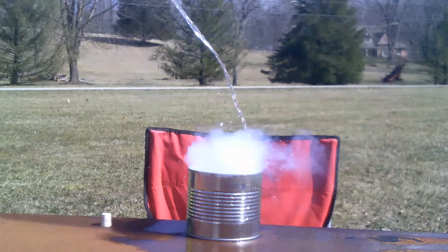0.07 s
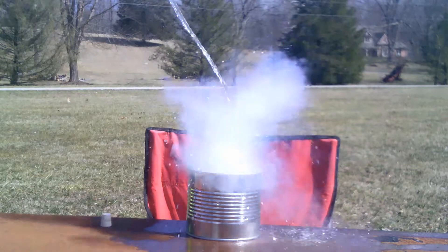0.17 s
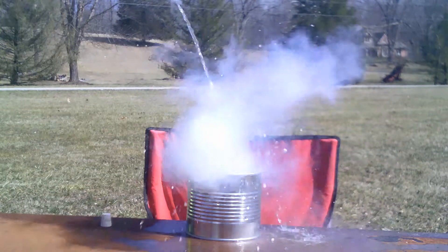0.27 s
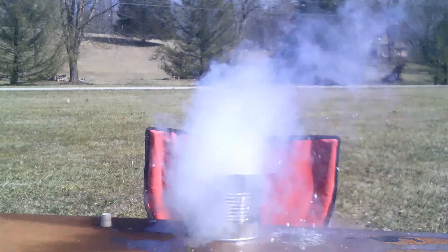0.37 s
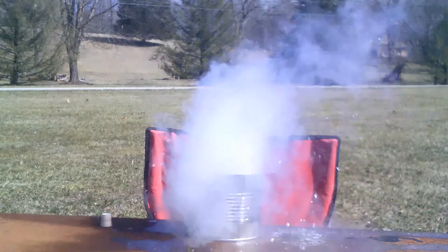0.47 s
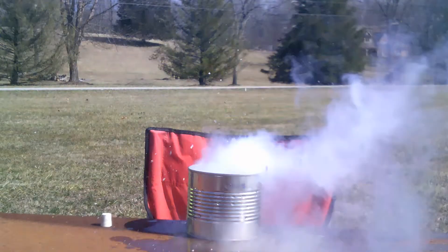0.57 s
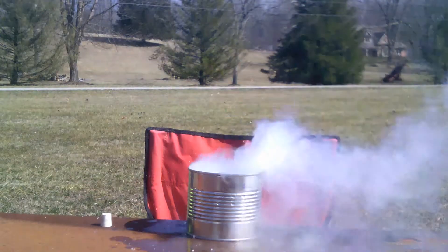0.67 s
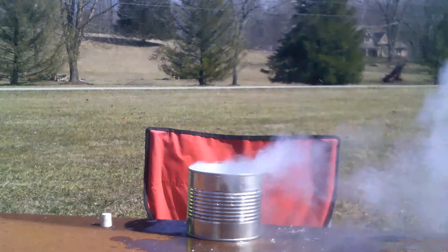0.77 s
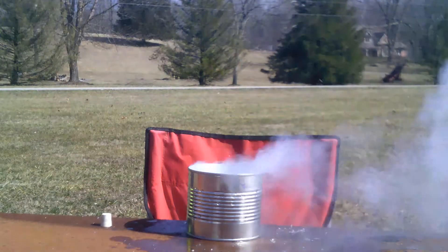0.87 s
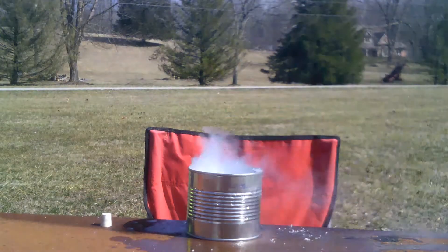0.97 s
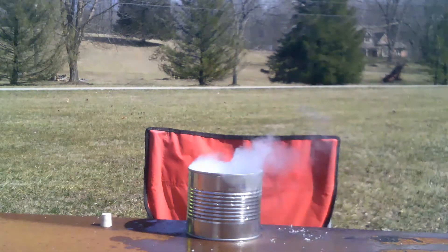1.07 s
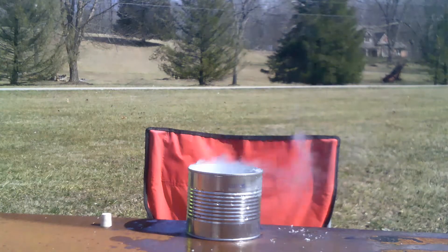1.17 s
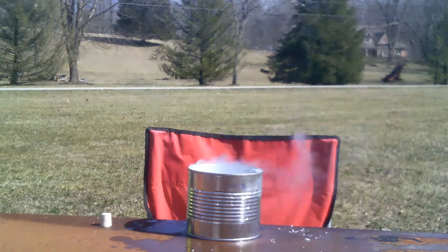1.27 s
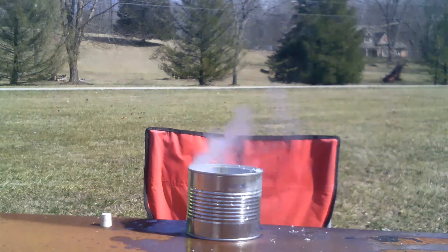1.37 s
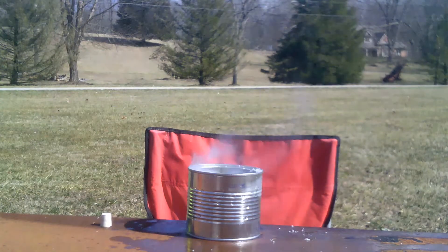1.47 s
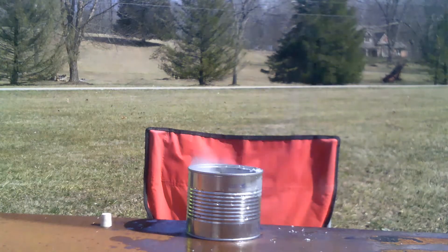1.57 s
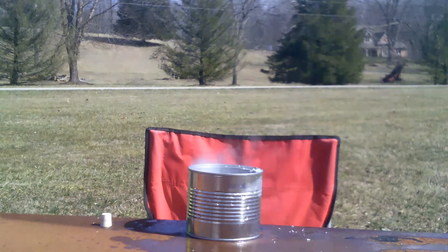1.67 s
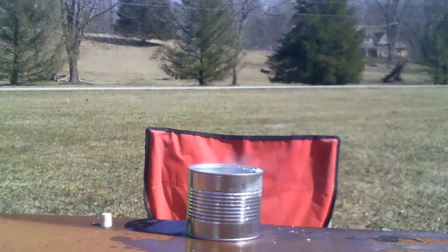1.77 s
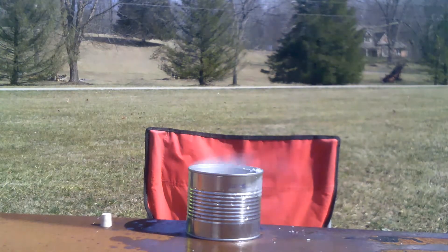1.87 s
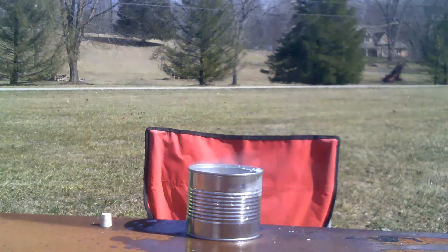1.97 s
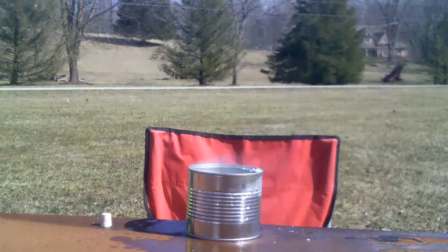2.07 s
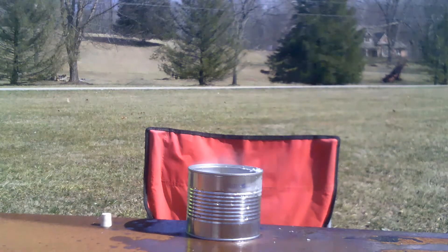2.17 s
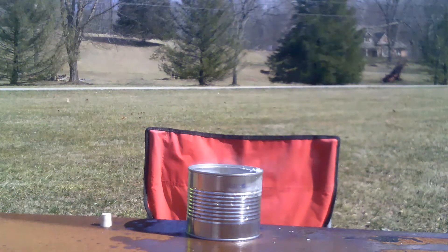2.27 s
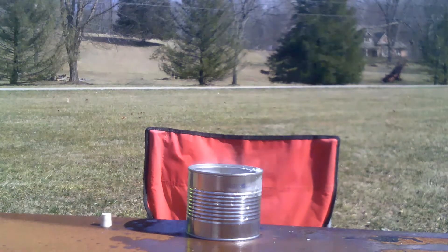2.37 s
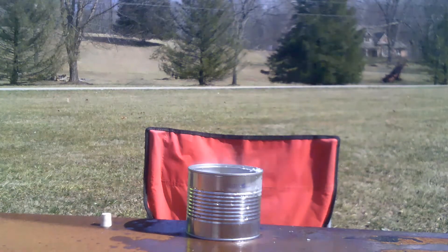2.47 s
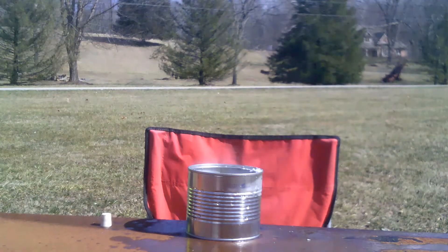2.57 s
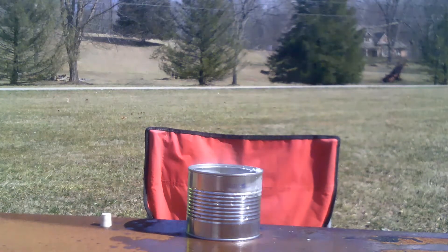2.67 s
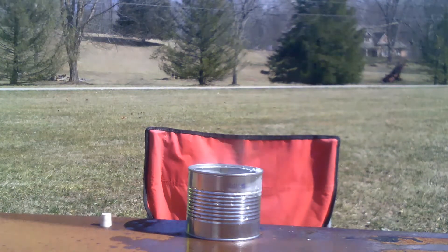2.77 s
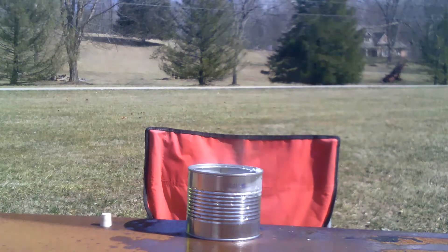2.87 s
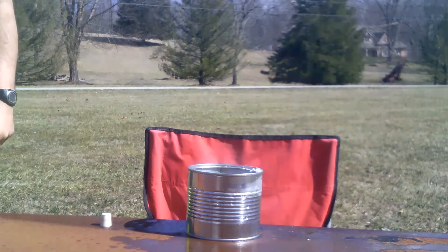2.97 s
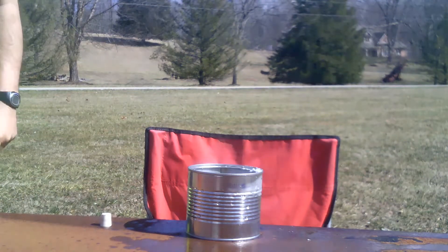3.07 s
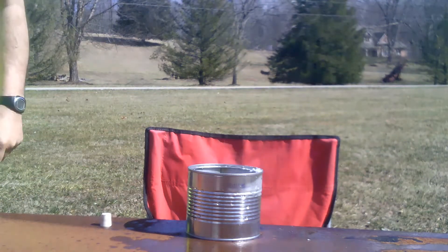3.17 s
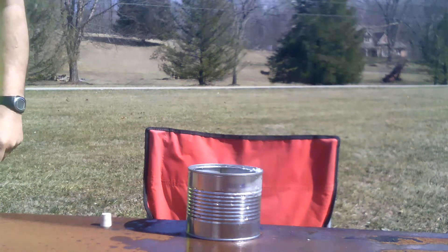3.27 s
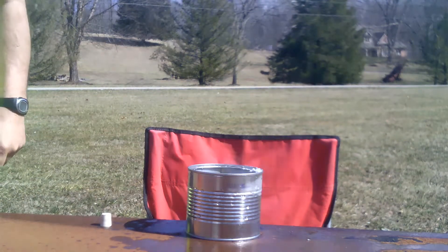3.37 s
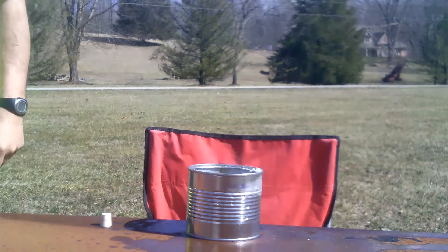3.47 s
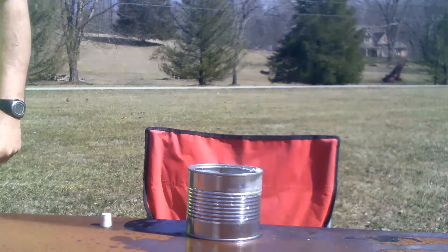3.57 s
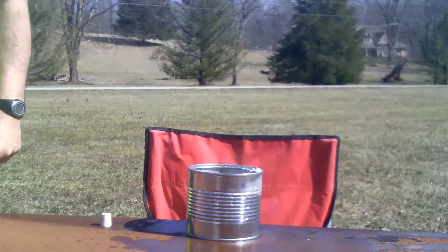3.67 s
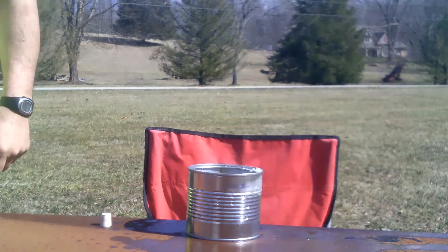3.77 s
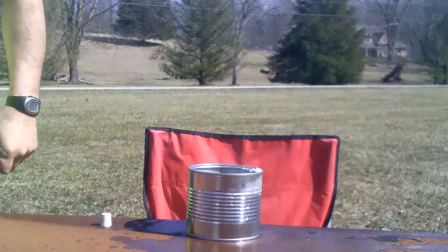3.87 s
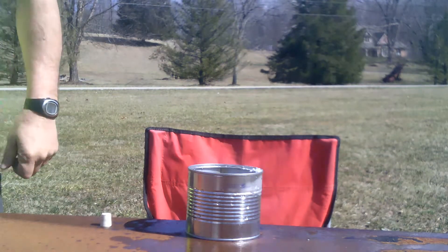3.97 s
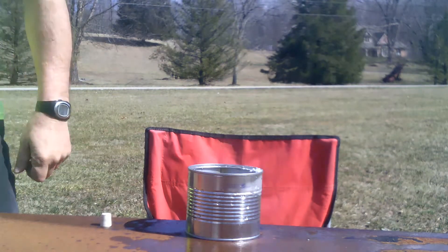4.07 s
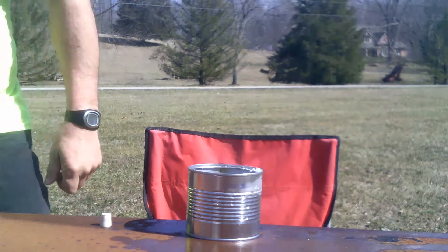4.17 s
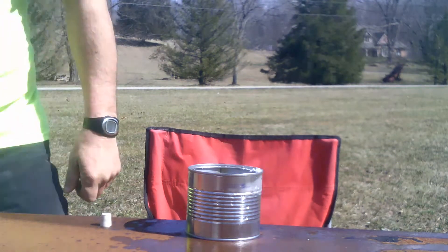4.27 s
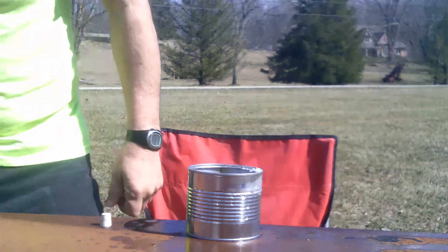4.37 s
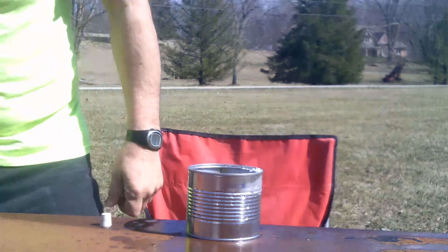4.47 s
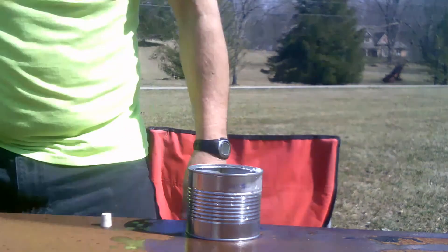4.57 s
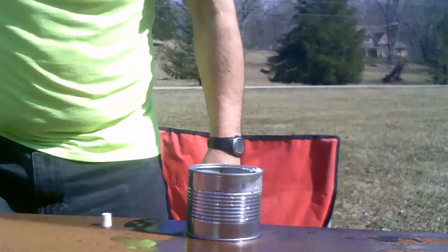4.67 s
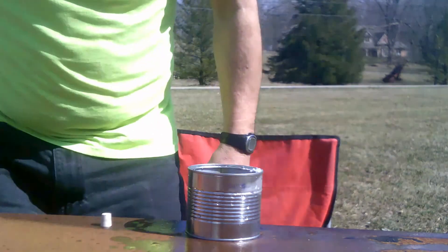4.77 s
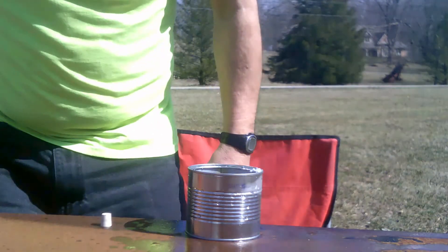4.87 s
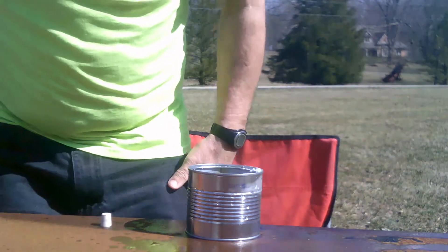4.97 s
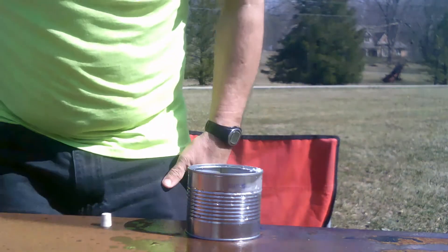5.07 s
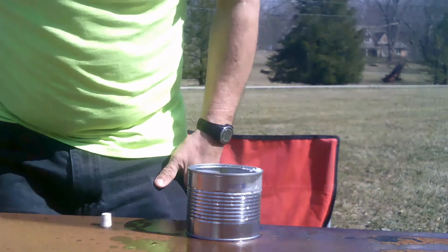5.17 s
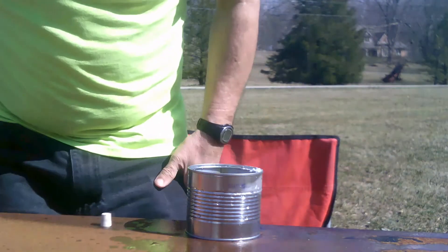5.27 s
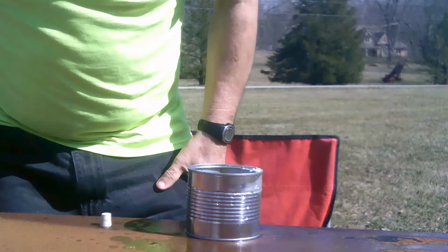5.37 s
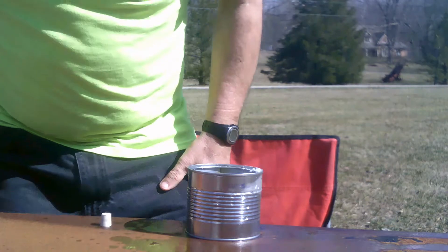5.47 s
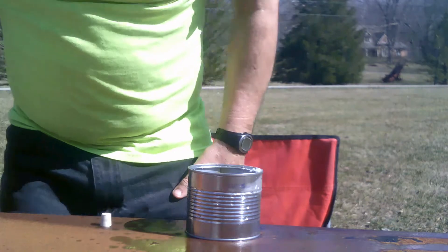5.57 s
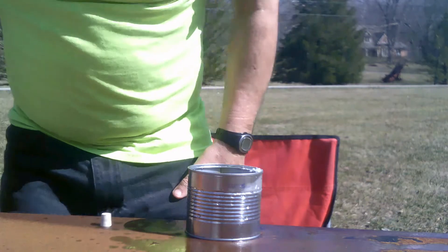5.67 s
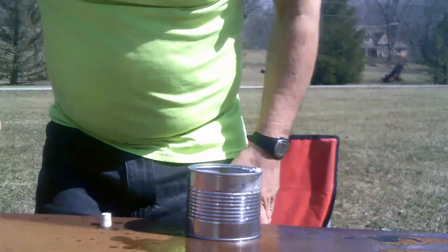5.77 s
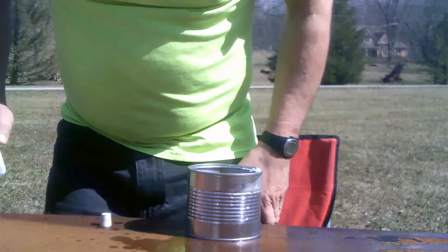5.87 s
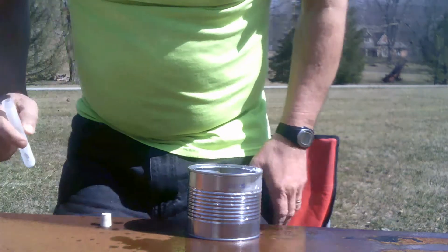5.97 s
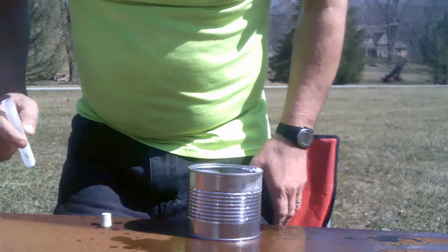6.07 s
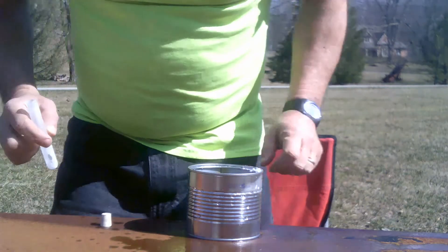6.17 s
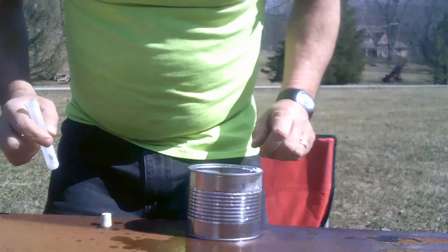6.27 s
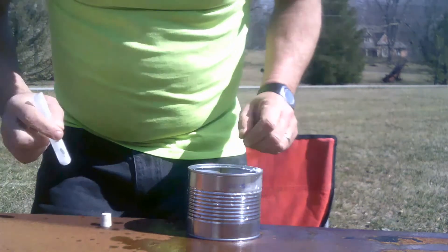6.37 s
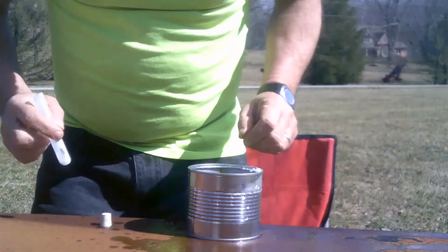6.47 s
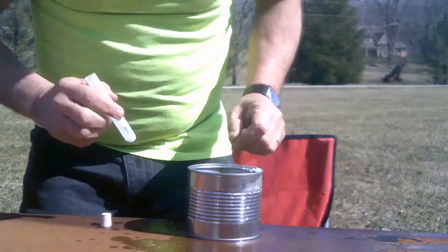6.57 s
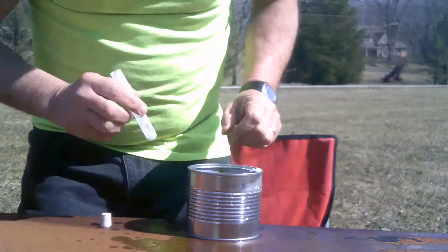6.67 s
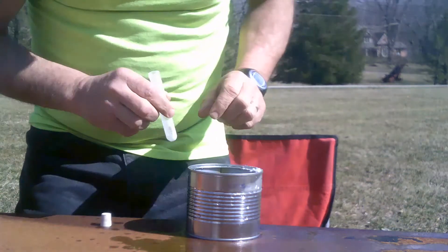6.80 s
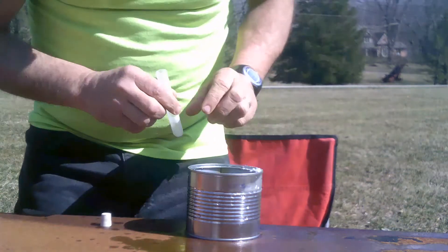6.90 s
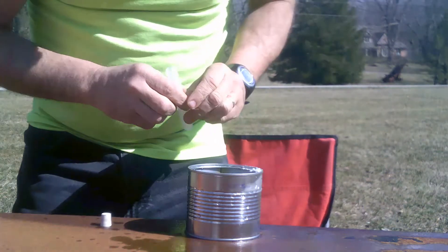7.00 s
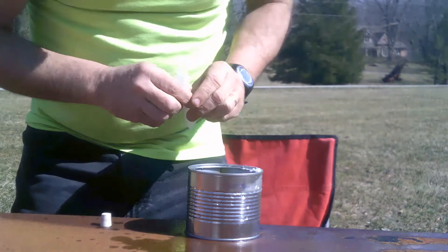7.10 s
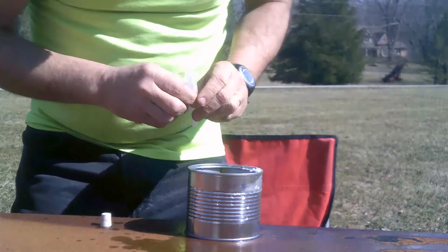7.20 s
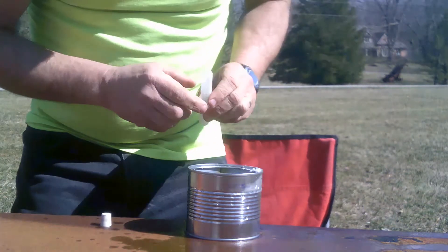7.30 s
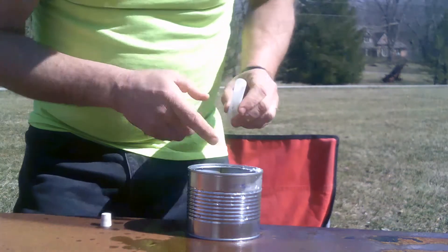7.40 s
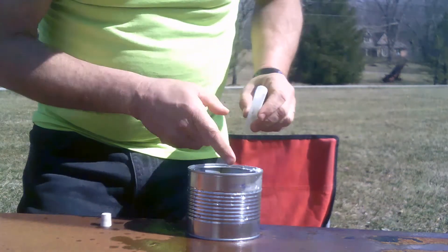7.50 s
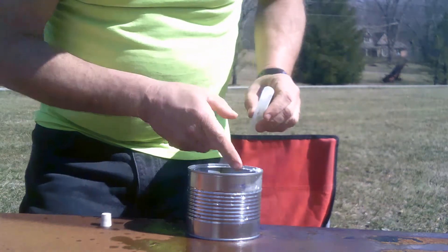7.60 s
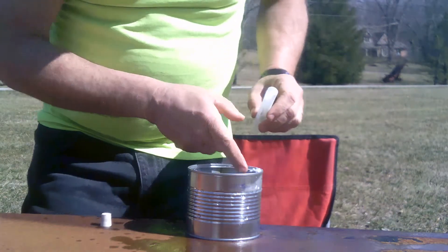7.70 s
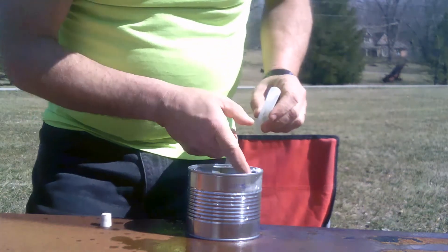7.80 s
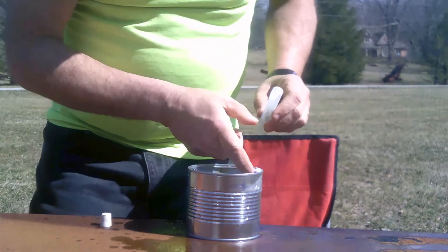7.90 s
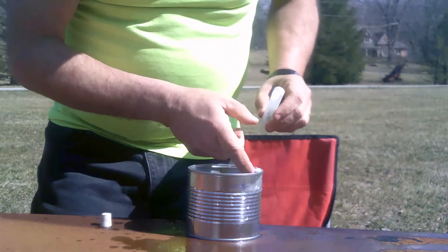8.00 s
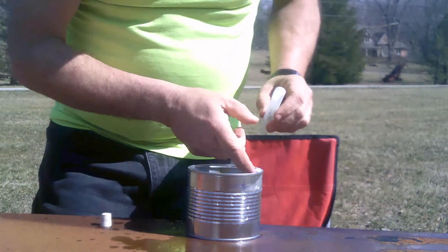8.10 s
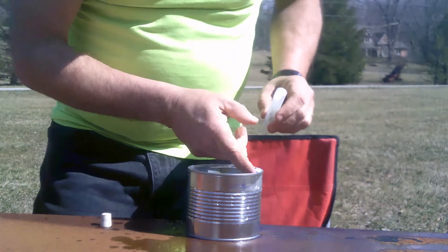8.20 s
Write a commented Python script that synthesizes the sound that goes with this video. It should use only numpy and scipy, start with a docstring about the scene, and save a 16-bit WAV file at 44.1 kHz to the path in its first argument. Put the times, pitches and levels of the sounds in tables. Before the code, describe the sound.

A violent hollow hissing burst and crackling splutter from a metal can, overloading at first, dies within a second into low lumpy wind rumble outdoors.

```python
"""Cold liquid flash-boiling in a can

A very cold liquid flash-boils on hot water in an open metal can on a lawn. Vapour bursts and seething ring three
gas modes, which dip and then rise as the cold heavy vapour warms and clears; splashing and spray add noise.
A few drops and fingers tick as short noise puffs. Wind buffets the microphone as lumpy low noise over a far,
nearly steady rush of coloured noise. The loudest bursts overload the small recorder and are cut flat."""
import sys
import numpy as np
from scipy import signal
from scipy.fft import rfft, irfft, next_fast_len
from scipy.io import wavfile
from scipy.ndimage import map_coordinates

SR = 44100
rng = np.random.default_rng(int(sys.argv[2]) if len(sys.argv) > 2 else 0)


def bounce(signal):
    """Save signal as a 16-bit WAV file at the path given by the first command-line argument."""
    frames = np.transpose(np.atleast_2d(signal))
    limited = np.clip(frames, -1, 1)
    pcm = np.round(limited * 32767).astype(np.int16)
    wavfile.write(sys.argv[1], SR, pcm)


N = 363428

# Boiling. Each row: time in seconds, seething drive in dB, spray in dB.
BOIL_LEVELS = [(0, -15.5, -31.5), (.05, -16.5, -32), (.16, -23, -35), (.24, -17.5, -31), (.28, -29, -39),
               (.31, -22, -24), (.39, -17, -30.5), (.44, -23.5, -35.5), (.66, -32, -39), (.89, -37, -48.5),
               (.94, -36, -40), (1.05, -42, -52), (1.25, -43, -56.5), (1.55, -49.5, -59.5),
               (2.1, -105, -115)]
# Gas in the can. Each row: time in seconds, lowest mode in Hz, second mode in Hz; both before the swirl.
GAS_MODES = [(0, 970, 1387), (.12, 785, 1344), (.45, 742, 1385), (.8, 894, 1508), (1.0, 975, 1778),
             (1.25, 990, 1957), (1.9, 1160, 2274)]
THIRD_OVER_SECOND = 1.459  # frequency ratio of the modes
SWIRL_SHARE = 0.0087  # swirling vapour wavers the modes by about this share
# The three modes, lowest first. Each row: width in Hz, gain for the seething in dB, gain for a burst in dB.
MODE_RINGS = [(130, -19, 5), (108, -24, -5), (100.7, -29.5, -8.5)]
# Vapour bursts. Each row: start in seconds, strength in dB, upper modes over it in dB, crack over it in dB,
# nominal length in ms.
BIG_BURSTS = [(0.0022, -2, -1.5, 1.5, 0.67), (0.0184, -1.7, 0, 11, 0.71), (0.0485, -13, -4, 6, .8),
              (0.0666, -11.5, -7, 0, 0.55), (0.092, -13.5, -4.5, 6, .6), (0.165, -8.5, -7, 1, 2.1),
              (0.192, -15, 0, 7, .7), (0.2125, -6.5, -6.5, 1.5, 1.3), (0.2275, -9.5, -1, 1, 1.1),
              (0.2388, -5.5, 2.5, 18, 0.92), (0.2654, -9.5, 2.5, 6, 1.7), (0.3075, -7.5, -1.5, 9, 1.8),
              (0.326, -12.5, 5, 12, .9), (0.3469, -2.8, -0.5, 3, 0.93), (0.3566, -8.5, -5, 11.5, .6),
              (0.3735, -10, 5, 20.5, 1.1), (0.3848, 0, 4, 19, 1.2), (0.3951, -1, 0, 18, 0.68),
              (0.4078, -6.5, -5, -1.5, .4), (0.4292, -4, -8.5, 4.5, 3.4), (0.4395, -5, -7.5, 1.5, 1.1),
              (0.461, -5, 7, 10.5, 2.4), (0.511, -21.5, 0.5, 12, 1.1), (0.535, -27, 5.5, 28.5, 4.1),
              (0.594, -28, 0, 11, 1.7), (0.6667, -17.5, 7, 23.5, 3.2), (0.7084, -29, 7, 10, 0.63),
              (0.838, -32, 7.5, 9, 2), (0.9238, -27, -13, 6, 4), (0.94, -22, -5, 4, 5),
              (0.9656, -27.5, -2.2, 13, 1.5), (1.2222, -30.5, -2, 1, 1.8)]
# Small bursts at random: strength over the seething, spread of strength and of upper modes, crack over strength.
SMALL_COUNT, SMALL_UNTIL_S, SMALL_MS = 40, .8, 0.68
SMALL_DB, SMALL_SPREAD_DB, SMALL_CRACK_DB = -1.9, 4, 8
CRACK_LENGTH_RATIO = 1.7  # over the burst length
WASH_DB, WASH_LENGTH_RATIO = 14, 1.9  # burst noise between the modes: over burst strength, over burst length
# Splashing heard straight from the rim. Each row: time in seconds, drive over the seething in dB.
FROTH_LEVELS = [(0, 4.5), (.3, 9.5), (.6, 3), (1.5, -1.5)]
# Splash filter. Each row: frequency in Hz, gain in dB.
SPLASH_GAINS = [(150, -34), (300, -20), (500, -8.5), (1050, 7), (1250, -5.5), (1750, -3.5), (2300, -1),
                (2600, -20)]
# Coarse spray spectrum. Each row: frequency in Hz, relative density in dB per Hz.
FIZZ_SPECTRUM = [(2200, -38.5), (2900, -9), (3500, 2.5), (4300, 0.5), (4800, -21)]
# Fine spray spectrum. Each row: frequency in Hz, relative density in dB per Hz.
MIST_SPECTRUM = [(4300, -18.5), (5200, -1.5), (6200, -2), (7200, 1.5), (8300, 0.5)]
MIST_DB = 4  # over the coarse spray
# Ticks. Each row: start in seconds, mid click in dB, top click in dB (both before the bands), length in ms.
TICK_EVENTS = [(1.1885, -7, 2.5, 4.5), (2.774, -26, -5.5, 2.5), (3.3348, -30, -11, 2.7),
               (5.4288, -25, -12, 2.2), (5.9868, -16, -5, 3.2), (7.424, -1, -27, 3.6),
               (7.5655, -7, -23.5, 4), (8.1693, -14, -16.5, 2.5)]
# Wind. Each row: time in seconds, strength in dB.
WIND_STRENGTH = [(0, -29), (.5, -23.5), (1.1, -26), (1.4, -26), (2.1, -23), (2.45, -30), (2.8, -34),
                 (3.1, -34), (3.35, -36.5), (3.7, -34.5), (4.0, -39), (4.3, -30.5), (4.47, -36), (4.7, -25),
                 (5.1, -31), (5.8, -38.5), (6.15, -34.5), (6.25, -30), (6.42, -28), (6.6, -34), (6.8, -34),
                 (7.37, -42), (7.6, -30.5), (7.75, -30.5), (8.0, -24.5), (8.24, -22)]
# Buffet spectrum. Each row: frequency in Hz, relative density in dB per Hz.
BUFFET_SPECTRUM = [(4.7, -36), (8.0, 4.5), (28, 2.5), (150, -23), (200, -50), (330, -120)]
# Flutter spectrum. Each row: frequency in Hz, relative density in dB per Hz.
FLUTTER_SPECTRUM = [(40, -7), (70, 2), (110, -3.5), (170, -6.5), (300, -13.5), (600, -28), (1000, -36)]
BUFFET_DB, FLUTTER_DB, GUSTY_DB = 4, -6.5, 2.9  # the first two over the wind; the last swings it quickly
FLUTTER_DB_PER_DB, CALM_DB = 0.98, -29  # flutter growth with wind strength, reckoned from a calm level
# Far rush spectrum. Each row: frequency in Hz, relative density in dB per Hz.
FAR_SPECTRUM = [(60, -23), (100, -5.5), (180, -7), (300, -12), (460, -9.5), (870, -17.5), (1120, -15),
                (1580, -26.5), (2070, -24), (3000, -28), (8300, -27.5)]
FAR_DB = -43
# Slow swell of the far rush. Each row: time in seconds, level change in dB.
FAR_SWAY = [(0, 1.5), (3, -0.65), (5.7, 1.1), (8.24, -0.6)]
# Microphone in its housing. Each row: frequency in Hz, gain in dB.
MIC_GAINS = [(1, -0.5), (2150, -0.5), (2500, -13.5), (3050, -14.5), (3300, -16), (3750, -20.5), (4050, -32),
             (5100, -37), (6200, -30), (7400, -26), (7800, -34.5), (8200, -63.5)]
TOP_HZ = 16000  # recorder's upper limit


def amp(db):
    """Gain of a level in dB."""
    return 10 ** (np.asarray(db) / 20)


def unit(x):
    """x at rms 1."""
    return x / np.sqrt(np.mean(x ** 2) + 1e-20)


def curves(rows):
    """One value per sample for each column after the time."""
    knots_s, *columns = np.transpose(rows)
    time_s = np.arange(N) / SR
    return [np.interp(time_s, knots_s, column) for column in columns]


def wobble(rate_hz):
    """A smooth random curve with rate_hz knots a second."""
    knots = rng.standard_normal(int(N * rate_hz / SR) + 4)
    return map_coordinates(knots, [np.arange(N) * rate_hz / SR])


def filtered(x, response):
    """x times a response of frequency in Hz."""
    size = next_fast_len(N + 8192)
    spectrum = rfft(x, size) * response(np.fft.rfftfreq(size, 1 / SR))
    return irfft(spectrum, size)[..., :N]


def coloured(x, points):
    """x through (Hz, dB) points on a log frequency axis, -120 dB outside them."""
    points_hz, points_db = np.transpose(points)

    def response(hz):
        return amp(np.interp(np.log(hz + 1), np.log(points_hz + 1), points_db, -120, -120))

    return filtered(x, response)


def noise(points):
    """Coloured noise of rms 1."""
    return unit(coloured(rng.standard_normal(N), points))


def band(x, low_hz, high_hz):
    """Causal band-pass."""
    return signal.sosfilt(signal.butter(2, [low_hz, high_hz], "band", fs=SR, output="sos"), x)


def puffs(times_s, levels_db, lengths_ms):
    """Noise puffs, each decaying exponentially over its length, of energy 1 before their level."""
    out, t = np.zeros(N + SR), np.arange(SR // 20) / SR
    draws = rng.standard_normal((len(times_s), len(t)))
    for start_s, db, ms, draw in zip(times_s, levels_db, lengths_ms, draws):
        puff = draw * np.exp(-1000 * t / max(ms, .1))
        out[round(start_s * SR):][:len(t)] += amp(db) * puff / np.linalg.norm(puff)
    return out[:N]


def boiling():
    """Bursts and lumpy seething drive three gas modes; splash, wash, cracks and spray add noise."""
    seethe_db, spray_db = curves(BOIL_LEVELS)
    seethe_gain = amp(seethe_db)
    lumps = amp(2.1 * wobble(70.4) + 1.5 * wobble(15.08))  # bubbles break in clumps
    seethe = seethe_gain * unit(lumps * rng.standard_normal(N))
    burst_rows = bursts(seethe_db)
    return (splashing(seethe_db, lumps) + gas_modes(seethe, burst_rows)
            + burst_noise(burst_rows) + spray(spray_db))


def bursts(seethe_db):
    """Columns of the big bursts plus random small ones whose strength follows the seething."""
    when, size = rng.random(SMALL_COUNT), rng.standard_normal((SMALL_COUNT, 2))
    start_s = SMALL_UNTIL_S * when ** 1.5  # denser early
    strength_db = seethe_db[(start_s * SR).astype(int)] + SMALL_DB + SMALL_SPREAD_DB * size[:, 0]
    upper_db = SMALL_SPREAD_DB * size[:, 1]
    crack_and_length = np.tile([SMALL_CRACK_DB, SMALL_MS], (SMALL_COUNT, 1))
    small = np.c_[start_s, strength_db, upper_db, crack_and_length]
    return np.r_[BIG_BURSTS, small].T


def gas_modes(seethe, burst_rows):
    """Three resonances of the gas in the can waver with the swirl and ring to seething and bursts."""
    start_s, strength_db, upper_db, _, length_ms = burst_rows
    swirl = 1 + SWIRL_SHARE * np.array([wobble(25.05), wobble(25)])
    low_hz, second_hz = curves(GAS_MODES) * swirl
    modes_hz = [low_hz, second_hz, THIRD_OVER_SECOND * second_hz]
    out = np.zeros(N)
    for hz, (width_hz, ring_db, burst_db), extra_db in zip(modes_hz, MODE_RINGS, [0, upper_db, upper_db]):
        swell = swells(start_s, strength_db + extra_db + burst_db, length_ms, hz)
        out += mode(amp(ring_db) * seethe, swell, hz, width_hz)
    return out


def mode(x, swell, hz, width_hz):
    """A resonance on a moving pitch, driven by noise x and by swells at its pitch; area 1 rings at height 1."""
    turn = np.exp(2j * np.pi * np.cumsum(hz) / SR)
    pole = np.exp(-np.pi * width_hz / SR)
    return np.imag(turn * signal.lfilter([1], [1, -pole], x / turn + swell))


def swells(times_s, levels_db, lengths_ms, hz):
    """Each burst's push on one mode: rises, dies, area 1 before its level, outward first with slight scatter."""
    out, t = np.zeros(N + SR, complex), np.arange(SR // 20) / SR
    phase_turns = np.cumsum(hz)[(times_s * SR).astype(int)] / SR
    phase_turns = phase_turns + 0.11 * rng.standard_normal(len(times_s))
    for start_s, db, ms, turns in zip(times_s, levels_db, lengths_ms, phase_turns):
        push = t * np.exp(-1000 * t / max(ms / 2, .05))
        out[round(start_s * SR):][:len(t)] += amp(db) * np.exp(-2j * np.pi * turns) * push / push.sum()
    return out[:N]


def burst_noise(burst_rows):
    """Each burst's turbulent noise: a wash between the modes and a higher, shorter crack."""
    start_s, strength_db, _, crack_db, length_ms = burst_rows
    wash = puffs(start_s, strength_db + WASH_DB, WASH_LENGTH_RATIO * length_ms)
    crack = puffs(start_s, strength_db + crack_db, CRACK_LENGTH_RATIO * length_ms)
    return band(wash, 280, 1500) + band(crack, 2900, 5300)


def splashing(seethe_db, lumps):
    """Froth splashes in the seething's clumps with sudden droplets, heard straight from the rim."""
    froth_db, = curves(FROTH_LEVELS)
    droplets = 0.8 + spatter(320, 2.7, 1.3)
    splash = amp(seethe_db + froth_db) * unit(lumps * droplets * rng.standard_normal(N))
    return coloured(splash, SPLASH_GAINS)


def spray(spray_db):
    """Coarse and fine spray fizz above the rim under one droplet envelope."""
    coarse = noise(FIZZ_SPECTRUM) * amp(1.5 * wobble(33))
    fine = amp(MIST_DB + 1.5 * wobble(21)) * noise(MIST_SPECTRUM)
    return amp(spray_db) * unit(2 + spatter(400, 2.5, 5.3)) * (coarse + fine)


def spatter(rate_hz, spread_db, life_ms):
    """An envelope of droplets: sudden starts of very unequal size, each dying fast; rms 1."""
    starts = (rng.random(N) < rate_hz / SR) * amp(spread_db * rng.exponential(size=N))
    return unit(signal.lfilter([1], [1, -np.exp(-1000 / (life_ms * SR))], starts))


def ticks():
    """Small dry contacts of drops and fingers: a mid click and a thin top click."""
    start_s, mid_db, top_db, length_ms = np.transpose(TICK_EVENTS)
    mid = band(puffs(start_s, mid_db, length_ms), 3160, 4300)
    top = band(puffs(start_s, top_db, length_ms), 4800, 9400)
    return mid + top


def wind():
    """Eddies press on the diaphragm in lumps: deep buffets and a faster flutter that share gusts."""
    strength_db, = curves(WIND_STRENGTH)
    gusts_db, eddies = GUSTY_DB * wobble(11), wobble(16)
    buffet_lumps = amp(gusts_db + 0.53 * eddies)
    buffet = amp(strength_db + BUFFET_DB) * unit(buffet_lumps * noise(BUFFET_SPECTRUM))
    flutter_db = CALM_DB + FLUTTER_DB_PER_DB * (strength_db - CALM_DB) + FLUTTER_DB
    flutter_lumps = amp(0.16 * gusts_db + 0.53 * eddies + 1.9 * wobble(40))
    flutter = amp(flutter_db) * unit(flutter_lumps * noise(FLUTTER_SPECTRUM))
    return buffet + flutter


def far_rush():
    """Coloured noise from afar, swelling slowly with a slight quick waver."""
    sway_db, = curves(FAR_SWAY)
    return amp(FAR_DB + sway_db + 0.39 * wobble(25)) * noise(FAR_SPECTRUM)


def scene():
    """Can, ticks, wind and far rush at one microphone."""
    return (boiling() + ticks() + wind() + far_rush())[None]


def record(dry):
    """The housing dulls the treble; peaks over full scale are cut flat; the band ends at TOP_HZ."""
    flat = np.clip(coloured(dry, MIC_GAINS), -1, 1)
    return filtered(flat, lambda hz: hz < TOP_HZ)


dry = scene()
out = record(dry)
bounce(out)
```